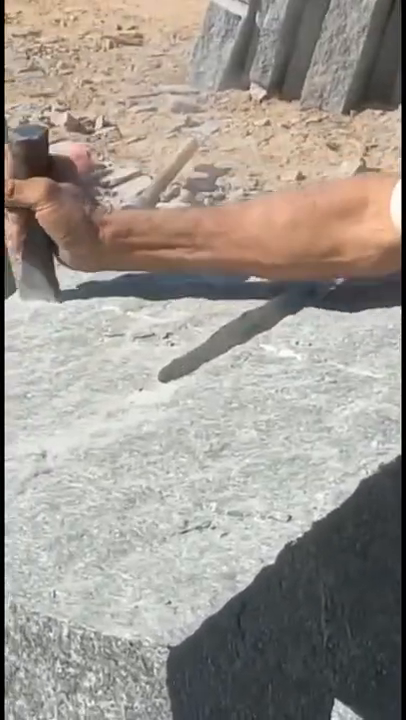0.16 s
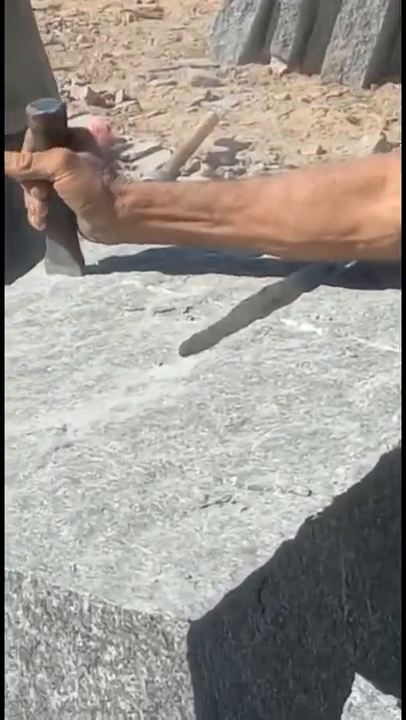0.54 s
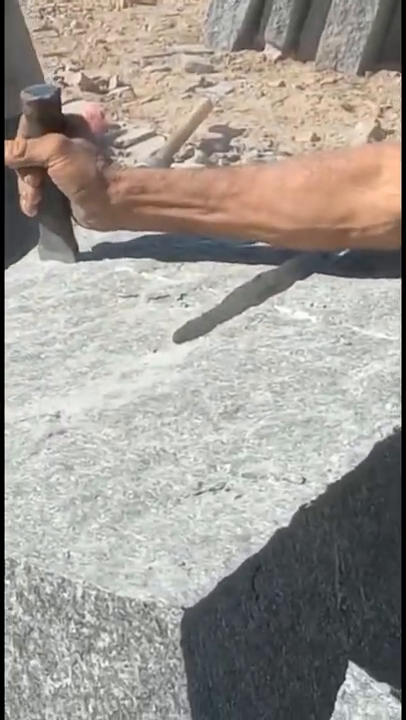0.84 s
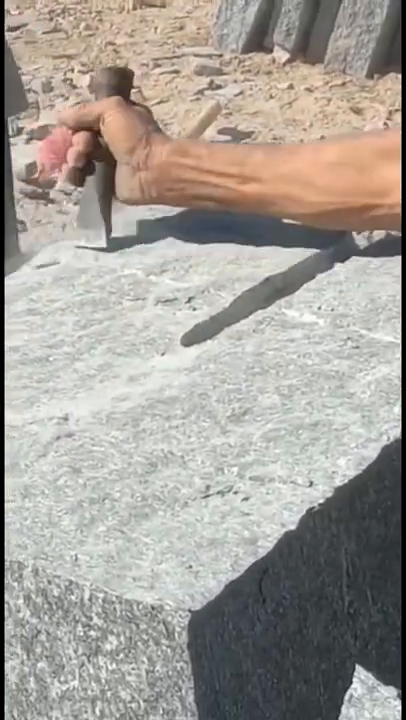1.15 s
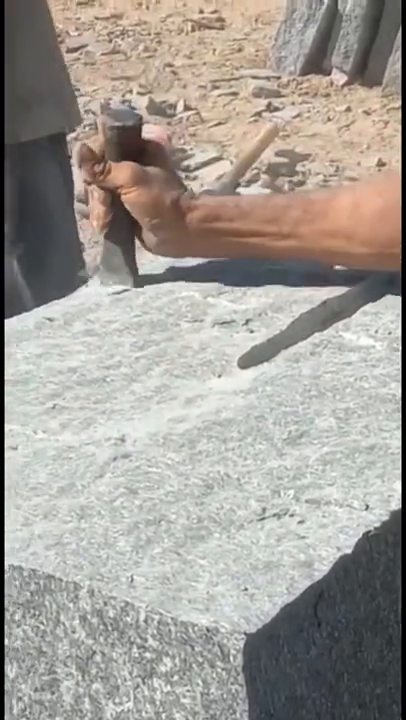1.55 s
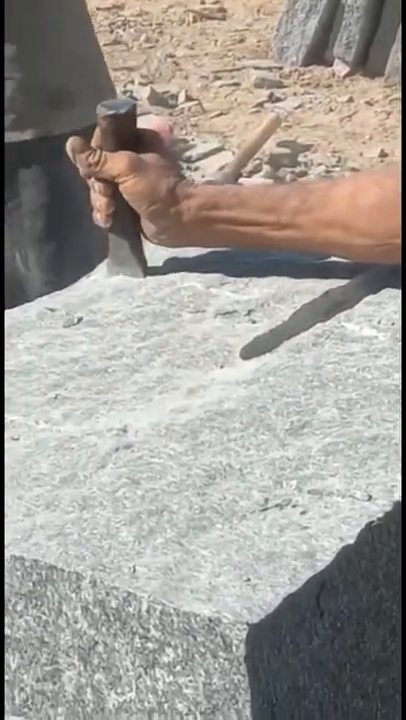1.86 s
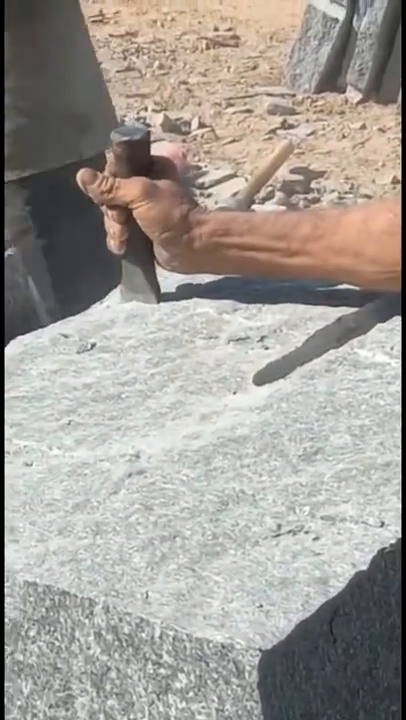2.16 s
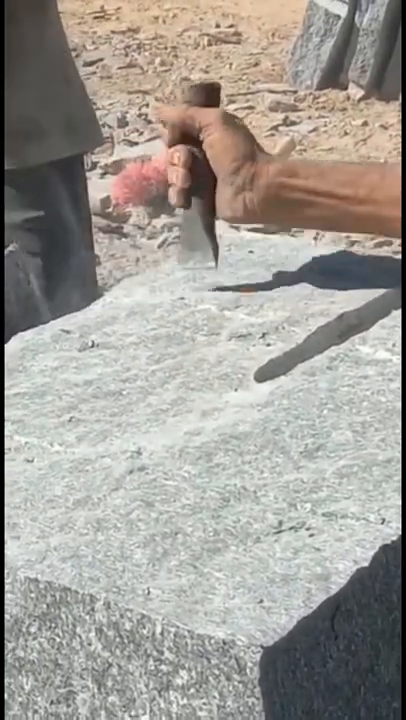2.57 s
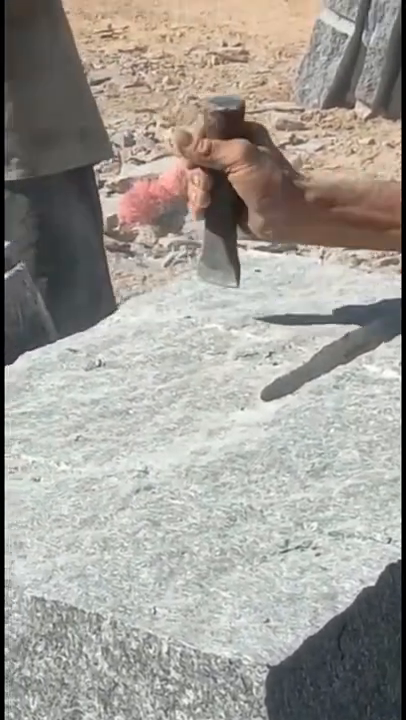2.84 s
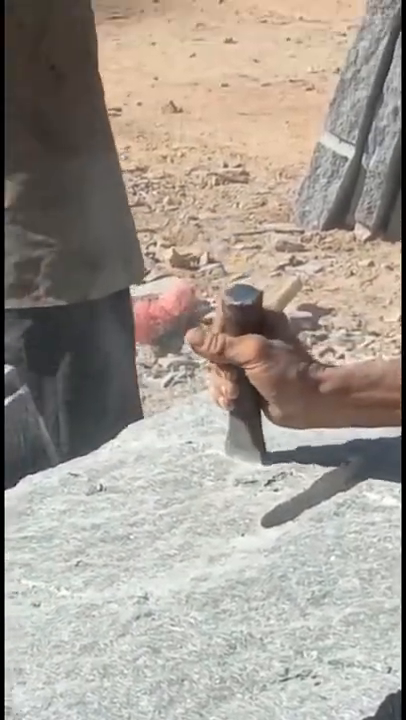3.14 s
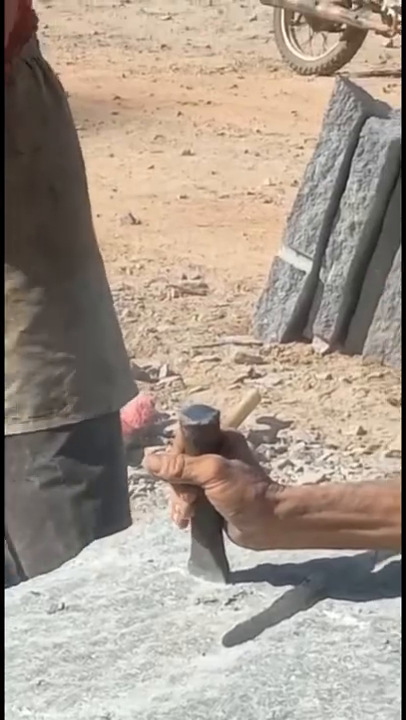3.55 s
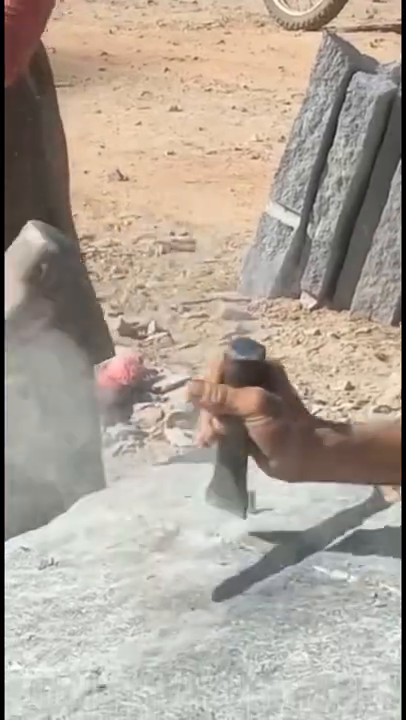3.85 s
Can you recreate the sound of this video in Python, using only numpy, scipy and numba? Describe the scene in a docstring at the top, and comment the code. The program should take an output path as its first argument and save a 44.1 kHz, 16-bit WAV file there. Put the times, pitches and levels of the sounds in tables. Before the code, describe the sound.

Three loud sledgehammer blows on a hand-held chisel crack stone, with light clinks between them.

```python
"""Open stone yard, microphone close to the block: a distant engine, hum, rumble and faint hiss run throughout.
Filtered noise, firing pulses and drifting sines make that bed; then a hand-held steel chisel clinks on the stone.
A sledgehammer strikes it three times: noise bursts crush stone, low sines thump the block, beating pairs ring the head.
Chips fall, noise clicks; the last blow throws grit, random grains, while a second hiss and the rumble swell.
The yard scatters the work faintly back; a gain control ducks loud sound and the overloads are clipped."""
import sys
import numpy as np
from scipy import signal
from scipy.fft import rfft, irfft
from scipy.io import wavfile
from scipy.ndimage import uniform_filter1d
from numba import njit

SR = 44100
rng = np.random.default_rng(int(sys.argv[2]) if len(sys.argv) > 2 else 0)


def store_pcm(level_fs):
    """Save levels as 16-bit WAV."""
    pcm = np.round(np.clip(level_fs, -1, 1) * 32767).astype(np.int16)
    wavfile.write(sys.argv[1], SR, np.atleast_2d(pcm).T)


N = 176400  # samples

# In spectra, dB per Hz is only the shape: the noise is scaled to rms 1 before its level is set.
# Distant engine, clatter and rumble spectrum. Each row: frequency in Hz, density in dB per Hz.
RUMBLE_SPECTRUM = [(20, -20), (30, -20), (41, -4.5), (52, -16), (85, -5.5), (135, 2.5), (165, 2),
                   (205, -11), (280, -2), (380, -8.5), (480, -2.5), (590, -17), (700, -5), (850, -12.5),
                   (1100, -13.5), (1600, -26), (2600, -26.5), (5000, -88)]
# Rumble swelling near the end. Each row: time in seconds, added level in dB.
RUMBLE_SWELL = [(0, 0), (2.9, 0.5), (3.5, 1), (4, 3)]
# Distant engine's wavering, drifting hum tones. Each row: mean frequency in Hz, mean level in dB.
HUM_TONES = [(134, -45), (266, -55), (466, -55), (488, -52), (700, -57)]
ENGINE_HZ, ENGINE_JITTER_S, ENGINE_T60_S = 22.58, 0.00025, 0.19  # firing rate, timing spread, clatter decay
ENGINE_DB, RUMBLE_DB = -42, -38
HUM_WAVER_DB, HUM_DRIFT = 4.5, 0.00707  # spread of level; of pitch, as a fraction

# Faint steady hiss. Each row: frequency in Hz, density in dB per Hz.
AIR_SPECTRUM = [(800, -6), (1400, 0), (1900, -4), (2330, 5), (2900, -4), (3500, -4), (3950, 4), (4500, -6),
                (5150, -13), (5550, -1), (6050, -8), (7300, -4), (8300, -1), (9700, -4), (10350, 1),
                (10600, -3), (10950, 2), (11700, -7), (12500, -7), (13200, -3), (13900, -11), (14850, 2),
                (15200, -4), (15700, -2)]
AIR_DB = -45
# Second hiss. Each row: frequency in Hz, density in dB per Hz.
HISS_SPECTRUM = [(800, -26), (2200, 10.5), (3600, 1.5), (5000, -0.5), (6500, 10.5), (8000, -3), (10000, -3),
                 (13000, -35), (15000, 10), (16000, 1.5)]
# Its swell near the end. Each row: time in seconds, level in dB.
HISS_SWELL = [(0, -76), (2.7, -64), (3.2, -52.5), (3.55, -43), (4, -42.5)]

# Pitches of the chisel's modes, in Hz.
CHISEL_HZ = [2230, 4165, 4200, 6270]
# The same modes, damped by the fist. Each row: relative level in dB, t60 in seconds before the grip's factor.
CHISEL_MODES = [(-7, 0.029), (-5, 0.038), (-2, 0.091), (-39, 0.019)]
# High chisel modes, with their own level in each clink.
# Each row: frequency in Hz, relative level in dB, t60 in seconds.
EDGE_MODES = [(9920, 3.5, 0.036), (14500, -2, .07)]
# Chisel landing on the stone. Each row: start in seconds, ring level in dB, ring length as a factor,
# high ring level in dB, scrape level in dB, scrape tilt in dB per octave,
# delay of the second contact in seconds, its level in dB relative to the first.
CLINKS = [(0.219, -14.5, 0.59, -49, -22.5, -7, 0.0061, -2), (.3240, -43, 0.6, -58, -53, -9, .006, 7),
          (1.0995, -21.5, 1.3, -52, -38, -1, 0.0025, 3), (1.5564, -24.5, 0.65, -30.5, -25, 2, 0.0038, 1.5),
          (1.655, -41.5, 0.92, -58, -51, 0, .008, 5), (2.934, -24.5, 0.54, -48, -24, 2.5, .0025, 6),
          (3.0566, -37.5, 1, -60, -35, 9, .009, -1)]
# Grinding contact on stone. Each row: frequency in Hz, density in dB per Hz before the tilt.
SCRAPE_SPECTRUM = [(150, -36), (500, -36), (900, 15), (2300, 14), (3200, -1), (4400, 19), (5600, 6),
                   (7000, -3), (10300, 1), (13000, -7), (15500, 3)]
SCRAPE_T60_S, CLINK_RISE_S, SECOND_CONTACT_DAMP_T60_S = 0.023, 0.00098, 0.0065

# Scatter from the yard. Each row: frequency in Hz, density in dB per Hz.
YARD_SPECTRUM = [(100, -9), (1000, -40), (2500, 12.5), (6000, -12.5), (10000, 17), (16000, -38.5)]
YARD_DB, YARD_T60_S, YARD_BUILDUP_S = -26, 0.4, 0.01

# Hammer blows. Each row: start in seconds, crack, thump and knock levels in dB, crack tilt in dB per octave,
# crack resonance in Hz, its lift in dB, chisel ring level in dB, then a level in dB for each of six hammer modes.
BLOWS = [(1.0340, 0.54, 2, -1, -0.41, 2190, 7.5, 0.5, -5, 1.5, 3, -1.5, -20, -9),
         (2.3323, 0.96, -9.5, -2.5, -0.25, 6600, 5.4, -11.5, 0, 0, 3.5, 3.5, 6, -4),
         (3.7089, -1.5, 1.5, 2, -0.46, 3480, 6.3, -15, -15, -5, 1, -3, 7, 9.5)]
BLOW_RISE_S = 0.00056
CHISEL_IN_BLOW_DB = -5.5
# Crushing stone. Each row: frequency in Hz, density in dB per Hz before tilt and resonance.
CRACK_SPECTRUM = [(25, -40), (70, -8), (200, 2.5), (500, -1.5), (1100, -2), (2100, -0.5), (3000, -3),
                  (4800, -3.5), (6200, 2.5), (7500, -10), (9800, -6), (11500, -15), (13600, -32),
                  (15000, -4), (16500, -37.5)]
CRACK_DB, CRACK_HOLD_S, CRACK_RESONANCE_OCTAVES = -9, 0.0065, 0.16
CRACK_T60_LOW_S, CRACK_T60_HIGH_S = 0.048, 0.06  # at 500 Hz and at 8 kHz
# Stone crumbs sprayed by every blow. Each row: frequency in Hz, density in dB per Hz.
CRUMBS_SPECTRUM = [(800, -30), (1600, -15.5), (2400, 4), (3300, 8), (4400, 5.5), (6500, 7.5), (8000, -12),
                   (10200, 6), (12000, -23), (15500, 2)]
CRUMBS_DB, CRUMBS_T60_S = -34, 0.5
CRUMBS_GRAIN_DB, CRUMBS_PER_S = 4.5, 250  # spread and rate of the level flicker
# Dull knock of the block under the edge. Each row: frequency in Hz, density in dB per Hz.
KNOCK_SPECTRUM = [(25, -35), (70, -4.5), (170, -4.5), (300, 2.5), (560, 4.5), (900, -3), (1400, -5),
                  (2500, -17), (6000, -60)]
KNOCK_DB, KNOCK_T60_S = -9.5, 0.044
# Thump of the stone block. Each row: frequency in Hz, relative level in dB, t60 in seconds.
BLOCK_MODES = [(71, -20, 0.1), (101, -20.5, 0.027), (127, -3, 0.064)]
THUMP_DB, THUMP_RISE_S = -13.5, 0.0038
# Pitches of the hammer head's modes, in Hz.
HAMMER_HZ = [7938, 8188, 10131, 10461, 12173, 14394]
# The same modes as beating pairs. Each row: relative level in dB, t60 in seconds while free,
# offset of the twin in Hz, level of the twin in dB relative to its mate.
HAMMER_PAIRS = [(-24, 0.29, 17, -16), (-14.5, 0.39, 24.5, -8), (-16, 0.13, 55, -1.5), (-12, .14, -11, -23),
                (-24.5, 0.33, 21, -8), (-19, 0.19, -14, -7)]
HAMMER_RISE_S, HAMMER_FLUTTER, HAMMER_FLUTTER_PER_S = 0.0024, 0.3, 106
HAMMER_FREE_S, HAMMER_DAMPED_T60_S = 0.12, 0.97  # rings freely at first, then this extra decay sets in

# Falling stone chips. Each row: start in seconds, level in dB.
CHIPS = [(2.976, -42), (3.8920, -19.5)]
# Their click. Each row: frequency in Hz, density in dB per Hz.
CHIP_SPECTRUM = [(600, -7), (2000, 0), (4000, -0.5), (5800, 2), (8000, -2), (10300, 2.5), (13000, -13),
                 (15300, -1)]
CHIP_RISE_S, CHIP_T60_S = 0.0011, 0.047
# Grit and dust thrown by the last blow. Each row: frequency in Hz, density in dB per Hz.
GRIT_SPECTRUM = [(600, -12), (1300, 0), (2100, 17), (3500, -17), (4800, -20), (6300, -18), (8000, -16),
                 (10000, -16), (13000, -20), (15300, -10)]
GRIT_DB, GRIT_T60_S, GRIT_PER_S = -36.5, 0.77, 2500

# Close microphone and its gain control
LIMIT_DB, LIMIT_ATTACK_S, LIMIT_RELEASE_S, LIMIT_RATIO = -6, 0.005, 0.05, 2.5
MIC_LOW_HZ, MIC_TOP_HZ = 38.4, 15700


def undb(db):
    """Decibels to gain."""
    return 10 ** (np.asarray(db) / 20)


def unit(x):
    """Scale to rms 1."""
    return x / np.sqrt(np.mean(x ** 2))


def colour(x, points, tilt_db=0):
    """Filter by (Hz, dB) points and a tilt per octave; rms 1."""
    octave = np.log2(np.maximum(np.fft.rfftfreq(len(x), 1 / SR), 1))
    hz, db = np.array(points).T
    shape_db = np.interp(octave, np.log2(hz), db)
    slope_db = tilt_db * np.maximum(octave, np.log2(hz[0]))
    return unit(irfft(rfft(x) * undb(shape_db + slope_db), len(x)))


def noise(points, tilt_db=0, size=N):
    """Coloured noise, rms 1."""
    return colour(rng.standard_normal(size), points, tilt_db)


def fade(t, t60):
    """Exponential decay from t = 0, falling 60 dB in t60 seconds."""
    return np.exp(-np.log(1000) * np.maximum(t, 0) / t60)


def rise(t, seconds):
    """Onset that approaches 1 with a time constant."""
    return 1 - np.exp(-t / seconds)


def walk(rate):
    """Random wander at a rate per second, spread near 1."""
    k = int(SR / rate)
    steps = np.repeat(rng.standard_normal(N // k + 1), k)
    return uniform_filter1d(steps, k)[:N]


def add(out, at, sound):
    """Mix a sound in at a time in seconds."""
    i = int(at * SR)
    out[i:i + len(sound)] += sound[:N - i]


def ring(modes, t):
    """Decaying sines of a struck body."""
    return sum(undb(db) * fade(t, t60) * np.sin(2 * np.pi * hz * t) for hz, db, t60 in modes)


def engine():
    """Distant firings, each with the same clatter, over a wavering exhaust hum and a blurred rumble."""
    t, pulses = np.arange(N) / SR, np.zeros(N)
    clatter = rng.standard_normal(N) * fade(t, ENGINE_T60_S)
    swell_db = np.interp(t, *np.array(RUMBLE_SWELL).T)
    rumble = undb(RUMBLE_DB + swell_db) * noise(RUMBLE_SPECTRUM)

    clock = np.cumsum(1 + HUM_DRIFT * walk(4)) / SR  # all tones drift together
    hum = 0
    for hz, db in HUM_TONES:
        level = undb(db + HUM_WAVER_DB * walk(4.68))
        hum = hum + level * np.sin(2 * np.pi * hz * clock)

    times = np.arange(0, N / SR, 1 / ENGINE_HZ)
    times = times + ENGINE_JITTER_S * rng.standard_normal(len(times))
    pulses[(times * SR).astype(int) % N] = 1
    firings = irfft(rfft(pulses) * rfft(clatter), N)
    return undb(ENGINE_DB) * colour(firings, RUMBLE_SPECTRUM) + hum + rumble


def air():
    """Steady faint hiss of filtered noise, and a second hiss that swells near the end."""
    swell = undb(np.interp(np.arange(N) / SR, *np.array(HISS_SWELL).T))
    return undb(AIR_DB) * noise(AIR_SPECTRUM) + swell * noise(HISS_SPECTRUM)


def chisel(t, length=1):
    """The bar's short ring; a loose grip lets it last longer."""
    modes = [(hz, db, t60 * length) for hz, (db, t60) in zip(CHISEL_HZ, CHISEL_MODES)]
    return ring(modes, t)


def clinks():
    """The chisel lands on one corner of its edge, then the other; each contact scrapes and restarts the ring."""
    out, t = np.zeros(N), np.arange(SR // 2) / SR
    for at, ring_db, length, edge_db, scrape_db, tilt_db, gap, second_db in CLINKS:
        # the second contact damps the first ring; nothing damps the second
        for delay, db, until in ((0, 0, gap), (gap, second_db, 1)):
            steel = undb(ring_db) * chisel(t, length) + undb(edge_db) * ring(EDGE_MODES, t)
            scrape = noise(SCRAPE_SPECTRUM, tilt_db, size=len(t)) * fade(t, SCRAPE_T60_S)
            contact = steel * fade(t - until, SECOND_CONTACT_DAMP_T60_S) + undb(scrape_db) * scrape
            add(out, at + delay, undb(db) * contact * rise(t, CLINK_RISE_S))
    return out


def yard(x):
    """Faint scatter from the ground and the stacked stones: the work convolved with a fading noise tail."""
    t = np.arange(SR) / SR
    buildup = 1 - np.exp(-(t / YARD_BUILDUP_S) ** 2)
    tail = noise(YARD_SPECTRUM, size=len(t)) * fade(t, YARD_T60_S) * buildup
    return undb(YARD_DB) * signal.fftconvolve(x, tail / np.linalg.norm(tail))[:N]


def crack(t, tilt_db, resonance_hz, lift_db):
    """Stone crushed under the edge: a short burst with one broad resonance; its bands die at their own rates."""
    hz = np.fft.rfftfreq(len(t), 1 / SR) + 1
    distance = np.log2(hz / resonance_hz) / CRACK_RESONANCE_OCTAVES
    lift = undb(lift_db * np.exp(-distance ** 2))
    burst = rfft(noise(CRACK_SPECTRUM, tilt_db, size=len(t))) * lift
    octave = np.clip(np.log2(hz / 500), 0, 4)
    out = 0
    for k, t60 in enumerate(np.geomspace(CRACK_T60_LOW_S, CRACK_T60_HIGH_S, 5)):
        weight = np.maximum(1 - abs(octave - k), 0)  # overlapping octave bands
        out = out + irfft(burst * weight, len(t)) * fade(t - CRACK_HOLD_S, t60)
    return undb(CRACK_DB) * out


def crumbs(t):
    """Crumbs sprayed by a blow: fading noise whose level flickers."""
    grain = undb(CRUMBS_GRAIN_DB * walk(CRUMBS_PER_S)[:len(t)])
    return undb(CRUMBS_DB) * noise(CRUMBS_SPECTRUM, size=len(t)) * fade(t, CRUMBS_T60_S) * grain


def hammer(t, mode_dbs):
    """The head rings in beating pairs that flutter as it rebounds; where it lands decides each pair's strength."""
    out = 0
    for hz, (db, t60, offset, twin_db), strike_db in zip(HAMMER_HZ, HAMMER_PAIRS, mode_dbs):
        beat = 1 + undb(twin_db) * np.exp(2j * np.pi * offset * t)
        wander = walk(HAMMER_FLUTTER_PER_S) + 1j * walk(HAMMER_FLUTTER_PER_S)
        flutter = 1 + HAMMER_FLUTTER * wander[:len(t)]
        carrier = np.exp(2j * np.pi * (hz * t + rng.random()))
        out = out + undb(db + strike_db) * fade(t, t60) * np.imag(beat * flutter * carrier)
    return out * rise(t, HAMMER_RISE_S) * fade(t - HAMMER_FREE_S, HAMMER_DAMPED_T60_S)


def blows():
    """Crack and crumbs, knock and thump of the block, short chisel ring and long hammer ring."""
    out, t = np.zeros(N), np.arange(SR) / SR
    for at, crack_db, thump_db, knock_db, tilt_db, resonance_hz, lift_db, chisel_db, *mode_dbs in BLOWS:
        stone = undb(crack_db) * crack(t, tilt_db, resonance_hz, lift_db) + crumbs(t)
        knock = undb(KNOCK_DB + knock_db) * noise(KNOCK_SPECTRUM, size=len(t)) * fade(t, KNOCK_T60_S)
        thump = undb(THUMP_DB + thump_db) * ring(BLOCK_MODES, t) * rise(t, THUMP_RISE_S)
        steel = hammer(t, mode_dbs) + undb(CHISEL_IN_BLOW_DB + chisel_db) * chisel(t)
        add(out, at, (stone + knock + thump + steel) * rise(t, BLOW_RISE_S))
    return out


def debris():
    """Chips fall as short noise clicks, and the last blow sprays fine grit as sparse random grains."""
    out, t = np.zeros(N), np.arange(SR) / SR
    for at, db in CHIPS:
        click = noise(CHIP_SPECTRUM, size=len(t)) * rise(t, CHIP_RISE_S) * fade(t, CHIP_T60_S)
        add(out, at, undb(db) * click)
    grains = (rng.random(len(t)) < GRIT_PER_S / SR) * rng.standard_normal(len(t))
    grit = colour(grains, GRIT_SPECTRUM) * fade(t, GRIT_T60_S)
    add(out, BLOWS[-1][0], undb(GRIT_DB) * grit)
    return out


def scene():
    """The background, the work on the block and its scatter from the yard, as one channel."""
    background = engine() + air()
    work = clinks() + blows() + debris()
    return (background + work + yard(work))[None]


@njit
def follow(x, attack, release):
    """Envelope follower with separate rates for rising and falling level."""
    out, e = np.empty(len(x)), 0.
    for i in range(len(x)):
        e += (abs(x[i]) - e) * (attack if abs(x[i]) > e else release)
        out[i] = e
    return out


def record(dry):
    """Close microphone: gain control ducks loud sound, peaks above full scale clip, deep bass and top are cut."""
    envelope = follow(dry[0], 1 / (LIMIT_ATTACK_S * SR), 1 / (LIMIT_RELEASE_S * SR))
    gain = np.maximum(envelope / undb(LIMIT_DB), 1) ** (1 / LIMIT_RATIO - 1)
    overloaded = np.clip(dry * gain, -1, 1)
    bass_cut = signal.butter(2, MIC_LOW_HZ, "high", fs=SR, output="sos")
    top_cut = signal.ellip(8, 0.2, 70, MIC_TOP_HZ, fs=SR, output="sos")
    return signal.sosfilt(top_cut, signal.sosfilt(bass_cut, overloaded))


dry = scene()
out = record(dry)
store_pcm(out)
```